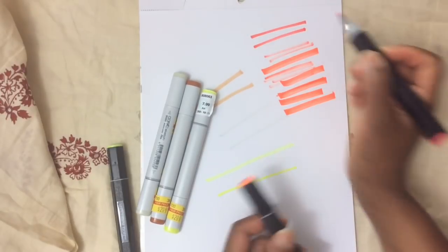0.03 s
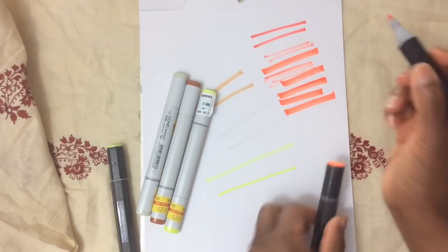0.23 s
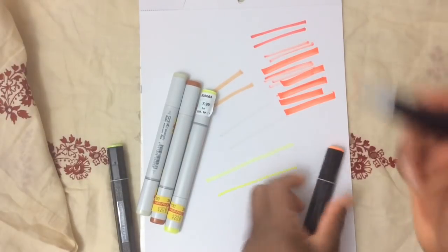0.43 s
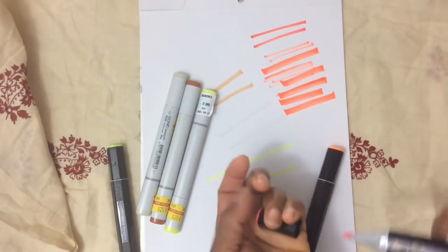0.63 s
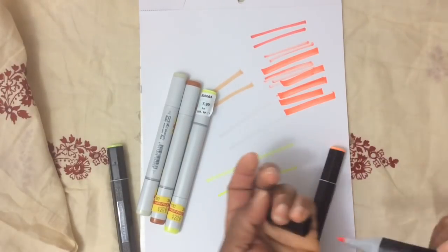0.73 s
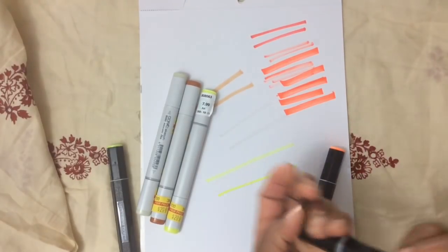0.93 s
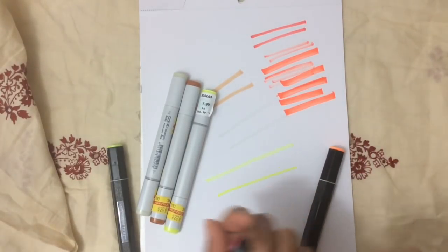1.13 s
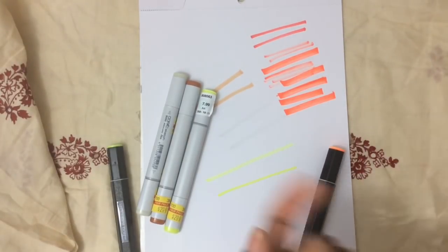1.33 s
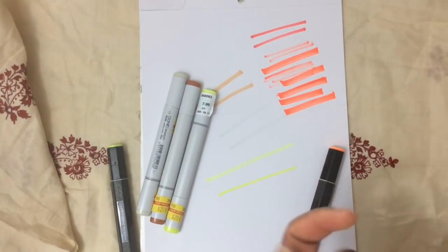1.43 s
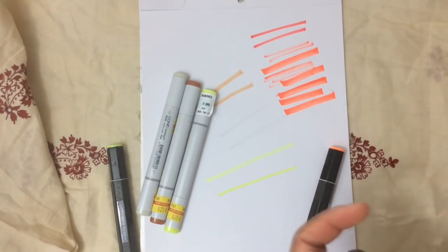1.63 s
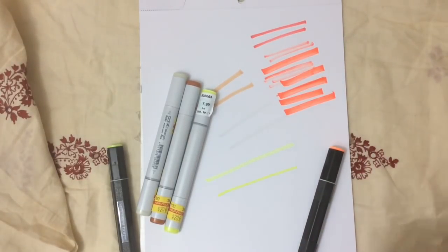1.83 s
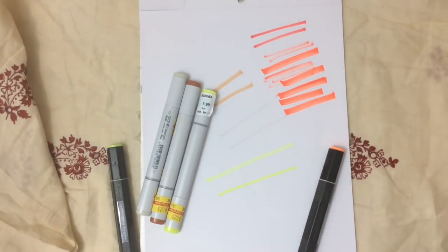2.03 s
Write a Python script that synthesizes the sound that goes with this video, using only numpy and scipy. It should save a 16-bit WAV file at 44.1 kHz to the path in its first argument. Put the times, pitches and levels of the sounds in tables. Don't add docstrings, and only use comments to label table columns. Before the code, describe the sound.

Hard plastic marker cap cracks shut and pops open, after a marker knocks on a papered table

```python
import sys
import numpy as np
from scipy import signal
from scipy.fft import rfft, irfft, next_fast_len
from scipy.io import wavfile

SR = 44100
rng = np.random.default_rng(int(sys.argv[2]) if len(sys.argv) > 2 else 0)


def makeup_ratio(level_db):
    decades = np.asarray(level_db, float) / 20
    return 10 ** decades


def output_pcm(signal):
    pcm = np.clip(np.atleast_2d(signal).T, -1, 1) * 32767
    wavfile.write(sys.argv[1], SR, np.round(pcm).astype(np.int16))


N = 92433
T = np.arange(N) / SR

# start_s, level_db, tilt_db_per_octave, crack_ms, gap_mode_stretch
SNAPS_ON = [(1.0085, -38, 3.5, 4.4, 0.66), (1.0136, -11.5, -2, 0.035, 1.1), (1.0146, -32, -1, .5, 1.05),
            (1.0157, -30.5, -0.5, .4, 0.94), (1.0216, -16, 4.5, .2, 0.74), (1.02205, 1, 10, 0.043, 0.96),
            (1.0231, -10.5, 3.5, 0.27, 0.68), (1.0262, -22, 7.5, 0.93, 0.85), (1.0295, -20, 4.5, 4.1, 0.56),
            (1.0332, -7, 2.5, .1, 1.5), (1.0335, -1, 4, .04, 1.26), (1.0338, -1.5, -4.5, .03, 1.17),
            (1.0345, -5.5, 6, 0.12, 1.48), (1.0352, -10.5, -1.5, 0.27, 0.81),
            (1.0360, -14.5, 0.5, 1.94, 1.3)]
# start_s, level_db, tilt_db_per_octave, crack_ms, gap_mode_stretch
SNAPS_OFF = [
    (1.5468, -13, -1.5, .2, 1.45),
    (1.5473, 6, -3, .04, 1.14),
    (1.5477, 3.5, -2.5, .1, 1.047),
    (1.5482, 0.5, -0.5, .15, .97),
    (1.5490, -12.5, -0.5, .3, 0.67),
    (1.5498, -13.5, -5, .5, 1.01),
    (1.5512, -18.5, 6, .3, 0.89),
]
# centre_hz, width_hz, level_db
CAP_ON_MODES = [(513, 1800, -21.5), (1500, 630, -15), (2240, 380, 1), (3255, 1200, -1.5), (4500, 850, -9.5),
                (5500, 430, -4), (7700, 1560, -0.5), (9400, 1960, -4), (12400, 3000, -24.5)]
# centre_hz, width_hz, level_db
CAP_OFF_MODES = [(1600, 900, -8.5), (2440, 503, -3.5), (2700, 410, 6), (3338, 660, 7.5), (4300, 2500, -4.5),
                 (5068, 900, -0.5), (6520, 1000, -2), (7900, 600, 0.5), (10420, 900, -15.5),
                 (11300, 2900, -9), (13500, 1500, -17)]
# freq_hz, level_db
ROOM_ON_COLOUR = [(180, -55.5), (300, -17), (517, -24), (707, -11.5), (1000, -18), (2320, -5.5),
                  (4410, -11.5), (9270, -8.5), (15500, -33)]
# freq_hz, level_db
ROOM_OFF_COLOUR = [(180, -43.5), (300, -22.5), (877, -25.5), (1160, -18.5), (1780, -19.5), (2740, -6.5),
                   (4870, -13.5), (7990, -14), (15500, -30)]
# centre_hz, width_hz, level_db
LEAK_BANDS = [(8200, 120, -33), (3700, 900, -33)]
# start_s, level_db, contact_ms
KNOCKS = [
    (0.2747, -10.5, 0.98),
    (0.2816, -21.5, 1.07),
    (0.2866, -17, 1.97),
    (0.3557, -19.5, 1.45),
    (0.362, -35, 3.1),
    (0.3683, -28, 1.45),
    (0.2761, -27.5, 0.7),
    (0.277, -28, 0.97),
]
# freq_hz, level_db, t60_s
TABLE_MODES = [(87.3, -16.5, 0.11), (163, -3, 0.069), (253, -7.5, 0.063), (297, -7.5, 0.056),
               (406, -3.5, 0.069), (483, -10, 0.087), (612, -10, 0.048), (701, -10, 0.11),
               (780, -11, 0.043), (848, -15, 0.09), (1030, -5, .035), (1160, -26, 0.042),
               (1460, -24, 0.028), (2200, -28, .025)]
# start_s, level_db, pitch_hz, t60_ms
THUMPS = [
    (0.0215, -42.5, 380, 20),
    (0.9925, -42, 850, 9.3),
    (1.0133, -27, 1350, 5),
    (1.0333, -23.5, 760, 8),
    (1.9018, -32, 390, 13.6),
]
# start_s,
# level_db, centre_hz, length_ms
TICKS = [(0.029, -49.5, 7400, 1), (0.057, -41, 9000, 0.58), (0.075, -38, 7300, 0.65),
         (0.079, -42, 12840, 1.), (0.085, -44.5, 9220, 0.93), (0.2745, -28, 5300, 0.72),
         (0.022, -43, 4500, 1.2), (0.3655, -49, 2900, 0.5), (0.367, -47, 9000, 1.5),
         (0.483, -41.5, 10000, 1.247), (1.94, -37, 9042, 1.), (0.3655, -31, 1590, 0.72),
         (0.433, -37, 4500, 1), (0.4335, -39.5, 9980, .6), (1.1414, -38, 2200, 1.6),
         (0.9925, -40.5, 2000, 1.1), (0.992, -31.5, 8900, 1.), (0.9995, -29, 6200, 1),
         (1.0003, -39.5, 1500, 0.88), (1.4914, -28.5, 8830, .7), (1.0221, -16, 13500, 0.13),
         (1.035, -10, 13500, .25), (1.4906, -43, 3500, .6), (1.5244, -29, 4500, 0.82),
         (1.5355, -38.5, 9000, 0.74), (0.2755, -27.5, 2700, 1.8), (1.5452, -32.5, 11900, 0.37),
         (1.698, -41, 2560, 4), (1.698, -38, 6200, 4.5), (1.89, -40, 6500, 0.77), (1.9017, -27, 4500, 0.52),
         (2.042, -43, 6470, .8)]
# start_s, length_s, level_db, centre_hz, width_octaves
RUBS = [(0.032, 0.062, -58.5, 9700, 0.92), (0.056, 0.22, -64, 1764, 0.77), (1.233, 0.14, -62, 6000, 0.84),
        (0.36, 0.15, -57, 2830, 1.1), (0.463, 0.028, -48.5, 1790, 0.5), (1.125, 0.058, -52.5, 4030, 2.3),
        (1.165, 0.088, -49, 10420, 0.38), (1.181, 0.07, -61, 2570, 1.2), (1.345, 0.082, -61, 7660, .6),
        (1.685, 0.084, -49, 5500, 0.95), (1.742, 0.11, -54, 7300, 1.05), (1.884, 0.051, -56.5, 6940, 0.93),
        (1.924, 0.076, -54, 9300, 0.94), (1.968, 0.16, -62.5, 8870, 0.74)]
# freq_hz, level_db_per_hz
AIR_COLOUR = [(25, -24), (110, -10), (300, -16), (1100, -29), (2100, -26), (3000, -31), (9500, -30),
              (15500, -47)]
# time_s, level_db
STIR = [(0, 0), (.5, 1.5), (.7, -3), (.97, -4), (1.1, 0), (1.45, -0.5), (1.85, -1.5), (2.1, -1)]

GAP_HZ = 6000
CRACK_DB = -26
SNAP_SPAN_SAMPLES = 2048
SNAP_LOW_HZ, SNAP_HIGH_HZ = 1050, 11056
ROOM_T60_LOW_S, ROOM_T60_HIGH_S = 0.16, 0.16
ROOM_ON_DB, ROOM_OFF_DB, ROOM_TICK_DB = -12.5, -8, -13
ROOM_BUILD_S, WALL_S, WALL_WIDTH_S = .002, .0145, .004
WALL_ON_DB, WALL_OFF_DB = -21, -5
ECHO_GRAIN_DB, ECHO_GRAIN_HZ = 1.2, 250
POP_S, POP_DB, POP_RISE_S, POP_FALL_S, POP_BACK, POP_HZ = 1.5479, -5.5, .004, .0085, .9, 42
LEAK_START_S, LEAK_END_S, LEAK_RISE_S = 1.526, 1.547, .007
KNOCK_DIP, KNOCK_DIP_S = .3, .0009
PAPER_DB, PAPER_HZ, PAPER_MS = -26, 700, 12
RUB_GRAIN_DB, RUB_GRAIN_HZ = 1, 298
AIR_DB, AIR_FLICKER_DB = -61, 1.0
HUM_HZ, HUM_WIDTH_HZ, HUM_DB = 122.2, 5.5, -62.5
TOP_HZ = 15700


def unit(x):
    return x / np.sqrt(np.mean(x ** 2))


def shaped(x, gain):
    n = next_fast_len(len(x), True)
    return irfft(rfft(x, n) * gain(np.fft.rfftfreq(n, 1 / SR) + 1), n)[:len(x)]


def curve(points):
    hz, db = np.array(points, float).T
    return lambda f: makeup_ratio(np.interp(np.log(f), np.log(hz), db))


def bell(centre_hz, octaves):
    return lambda f: np.exp(-.5 * (np.log2(f / centre_hz) / octaves) ** 2)


def ring(x, hz, t60_s):
    pole = np.exp(2j * np.pi * hz / SR - np.log(1000) / (t60_s * SR))
    return signal.lfilter([1], [1, -pole], x.astype(complex))


def burst(start_s, ms, noise):
    u = T - start_s
    return noise * np.exp(-np.maximum(u, 0) * 1000 / ms) * np.clip(u * SR / 2 + 1, 0, 1)


def walk(hz):
    return unit(shaped(rng.standard_normal(N), lambda f: 1 / (1 + (f / hz) ** 2)))


def snaps(table, cap_modes, colour, wall_db):
    out, energy = np.zeros(N), np.zeros(N)
    noise = np.sign(rng.standard_normal(N))
    for start_s, level_db, tilt_db, crack_ms, stretch in table:
        first = int(start_s * SR) - 2
        at = slice(first, first + SNAP_SPAN_SAMPLES)
        crack = burst(start_s, crack_ms, noise)[at]
        body = 0
        for k, (hz, width_hz, mode_db) in enumerate(cap_modes):
            gain = makeup_ratio(mode_db + tilt_db * np.log2(hz / 5000)) * width_hz
            mode_hz = hz * stretch if hz > GAP_HZ else hz
            body = body + (-1) ** k * gain * ring(crack, mode_hz, 2.44 / width_hz).imag
        snap = makeup_ratio(level_db) * (body / np.abs(body).max() + makeup_ratio(CRACK_DB) * crack)
        out[at] += snap
        energy[first] += np.sum(snap ** 2)
    return out, room(energy, colour, wall_db)


def room(energy, colour, wall_db):
    t = T[:SR // 2]
    noise = unit(shaped(rng.standard_normal(N), curve(colour)))
    low = shaped(noise, lambda f: 1 / (1 + (f / 4500) ** 4))
    wall = makeup_ratio(wall_db) * np.exp(-.5 * ((t - WALL_S) / WALL_WIDTH_S) ** 2)
    build = (1 - np.exp(-t / ROOM_BUILD_S)) * (1 + wall)
    fades = [(build * makeup_ratio(-60 * t / t60)) ** 2 for t60 in (ROOM_T60_LOW_S, ROOM_T60_HIGH_S)]
    total = np.sum(fades[0])
    powers = [signal.fftconvolve(energy, fade / total)[:N] for fade in fades]
    low_env, high_env = [np.sqrt(np.maximum(p, 0)) for p in powers]
    return (low * low_env + (noise - low) * high_env) * makeup_ratio(ECHO_GRAIN_DB * walk(ECHO_GRAIN_HZ))


def pop():
    u = T - POP_S
    flip = 1 / (1 + np.exp(-np.clip(u / 0.00018, -50, 50)))
    push = (1 - flip) * np.exp(np.minimum(u, 0) / POP_RISE_S)
    suck = POP_BACK * flip * np.exp(-np.maximum(u, 0) / POP_FALL_S)
    puff = (push - suck) * np.cos(2 * np.pi * POP_HZ * u)
    return makeup_ratio(POP_DB) * shaped(puff, lambda f: 1 / (1 + (35 / f) ** 4))


def leak():
    whistle = 0
    for hz, width_hz, db in LEAK_BANDS:
        once = ring(rng.standard_normal(N), hz, 2.2 / width_hz)
        whistle = whistle + makeup_ratio(db) * unit(ring(once, hz, 2.2 / width_hz).imag)
    swell = np.exp(np.minimum(T - LEAK_END_S, 0) / LEAK_RISE_S) * (T < LEAK_END_S)
    return whistle * swell * np.clip((T - LEAK_START_S) / .004, 0, 1)


def hump(start_s, ms):
    return np.sin(np.pi * np.clip((T - start_s) * 1000 / ms, 0, 1)) ** 2 / (ms * SR / 2000)


def knocks():
    noise = unit(shaped(rng.standard_normal(N), bell(PAPER_HZ, 0.84)))
    push, paper = 0, 0
    for start_s, db, ms in KNOCKS:
        push = push + makeup_ratio(db) * (hump(start_s, ms) - KNOCK_DIP * hump(start_s - KNOCK_DIP_S, ms))
        paper = paper + makeup_ratio(db + PAPER_DB) * burst(start_s, PAPER_MS, noise)
    return .5 * sum(makeup_ratio(db) * ring(push, hz, t60).real for hz, db, t60 in TABLE_MODES) + paper


def thumps():
    out = 0
    for start_s, db, hz, ms in THUMPS:
        u = np.maximum(T - start_s, 0)
        onset = 1 - np.exp(-u * hz * 4)
        out = out - makeup_ratio(db - 60000 * u / ms) * np.sin(2 * np.pi * hz * u) * onset
    return out


def ticks():
    out, noise = 0, rng.standard_normal(N)
    for start_s, db, hz, ms in TICKS:
        band = signal.butter(2, [hz / 1.9, min(hz * 1.7, 20000)], "band", fs=SR)
        click = signal.lfilter(*band, burst(start_s, ms, noise))
        out = out + makeup_ratio(db) * click / np.abs(click).max()
    return out


def rubs():
    out, noise = 0, rng.standard_normal(N) * makeup_ratio(RUB_GRAIN_DB * walk(RUB_GRAIN_HZ))
    for start_s, length_s, db, hz, octaves in RUBS:
        swell = np.sin(np.pi * np.clip((T - start_s) / length_s, 0, 1) ** 1.5) ** 1.1
        out = out + makeup_ratio(db) * unit(shaped(noise, bell(hz, octaves))) * swell
    return out


def air():
    noise = shaped(rng.standard_normal(N), curve(AIR_COLOUR))
    noise = noise / np.std(shaped(noise, lambda f: f > 200))
    stir_db = np.interp(T, *np.array(STIR).T)
    out = 0
    for hz in 20 * 2 ** np.arange(11):
        octave = shaped(noise, lambda f: np.clip(1 - np.abs(np.log2(f / hz)), 0, 1))
        out = out + makeup_ratio(AIR_FLICKER_DB * walk(2.5) + (hz > 1000) * stir_db) * octave
    return makeup_ratio(AIR_DB) * out


def hum():
    return makeup_ratio(HUM_DB) * unit(ring(rng.standard_normal(N), HUM_HZ, 3.1 / HUM_WIDTH_HZ).imag)


def scene():
    on, on_echo = snaps(SNAPS_ON, CAP_ON_MODES, ROOM_ON_COLOUR, WALL_ON_DB)
    off, off_echo = snaps(SNAPS_OFF, CAP_OFF_MODES, ROOM_OFF_COLOUR, WALL_OFF_DB)
    on = shaped(on, lambda f: 1 / (1 + (f / SNAP_HIGH_HZ) ** 12))
    off = shaped(off, lambda f: 1 / (1 + (SNAP_LOW_HZ / f) ** 4))
    clicks = ticks()
    click_echo = room(clicks ** 2, ROOM_ON_COLOUR, WALL_ON_DB)
    wet = makeup_ratio(ROOM_ON_DB) * on_echo + makeup_ratio(ROOM_OFF_DB) * off_echo + makeup_ratio(ROOM_TICK_DB) * click_echo
    mix = on + off + wet + pop() + leak() + knocks() + thumps() + clicks + rubs() + air() + hum()
    return mix[None]


def top_cut(x):
    return signal.sosfilt(signal.butter(12, 15610, fs=SR, output="sos"), x)


def record(dry):
    low_pass = signal.ellip(8, .2, 60, TOP_HZ, fs=SR, output="sos")
    mix = np.clip(signal.sosfilt(low_pass, dry), -1, 1)
    return top_cut(mix)


dry = scene()
out = record(dry)
output_pcm(out)
```